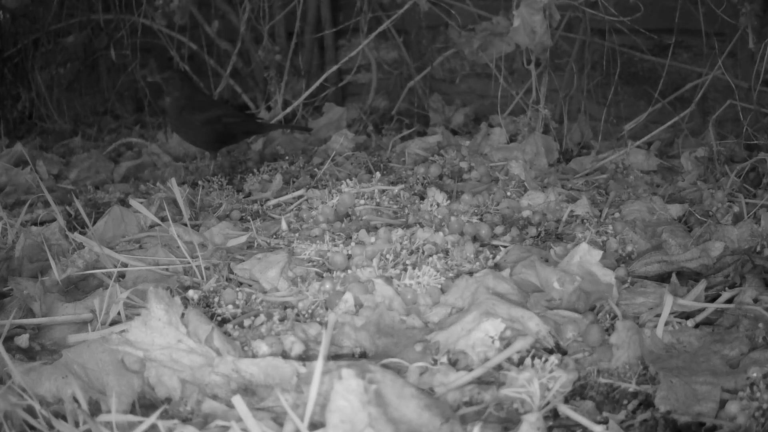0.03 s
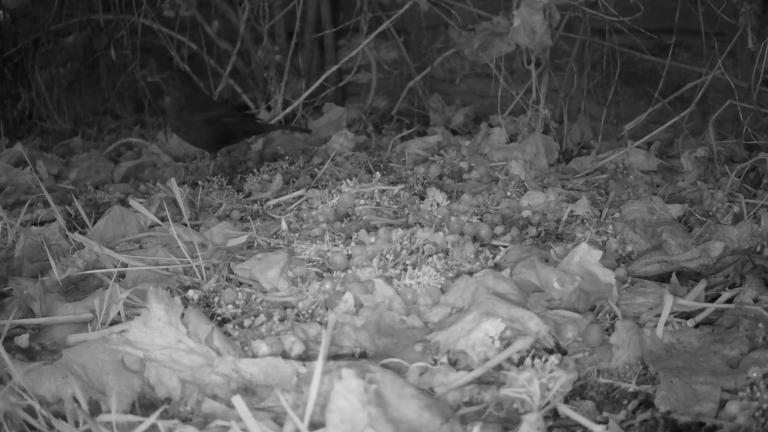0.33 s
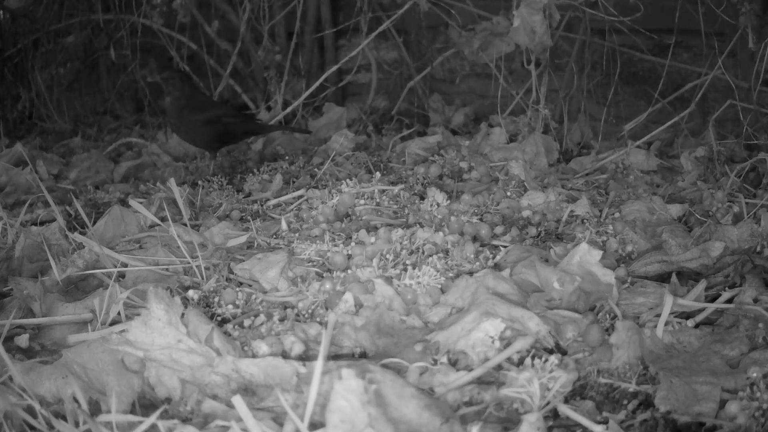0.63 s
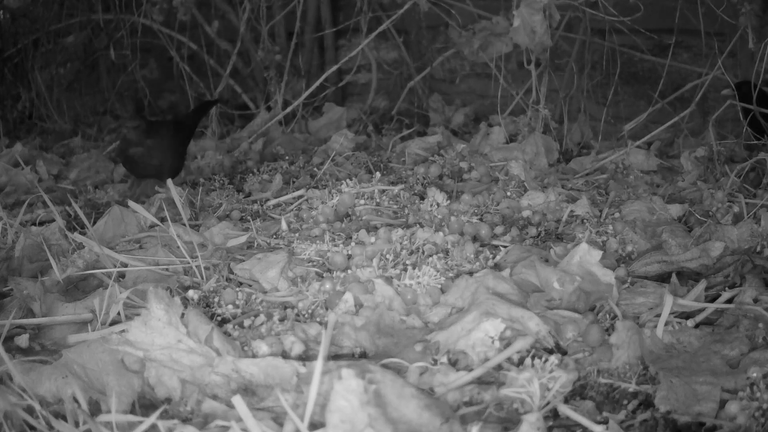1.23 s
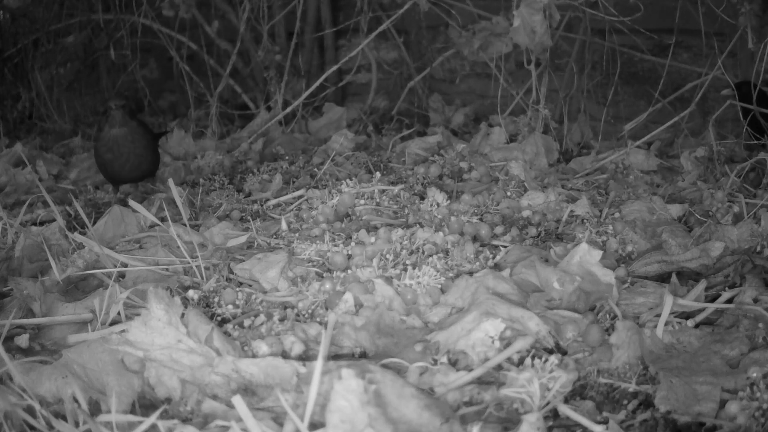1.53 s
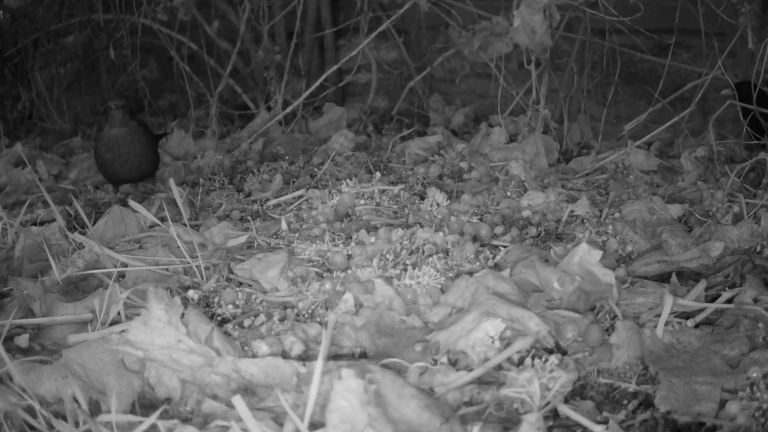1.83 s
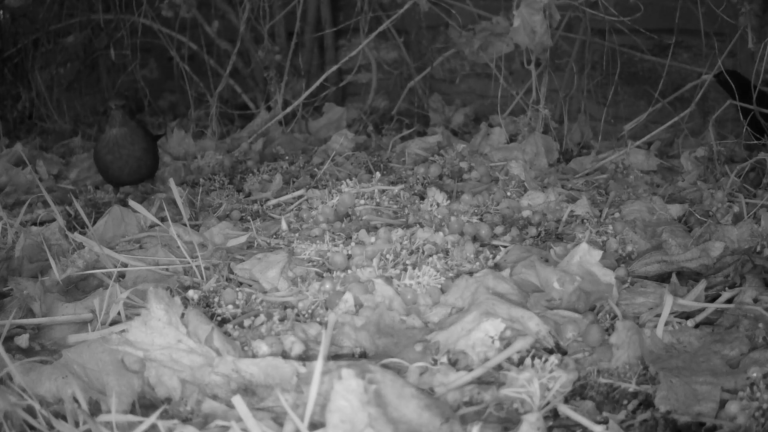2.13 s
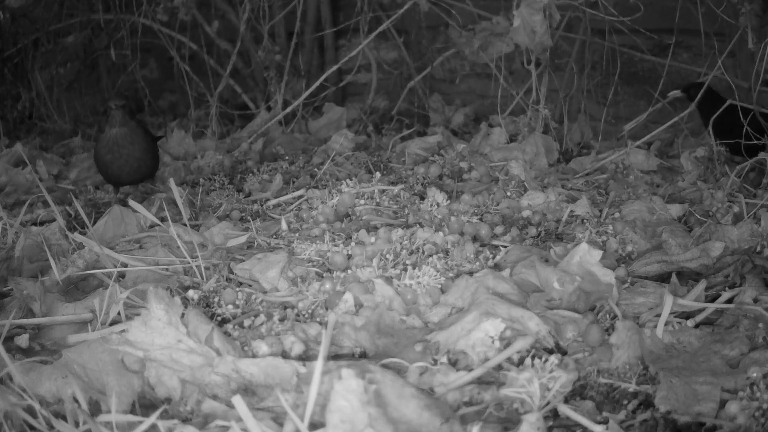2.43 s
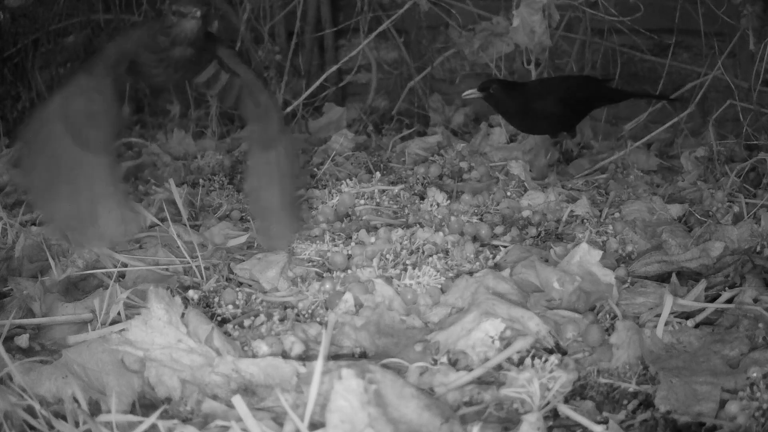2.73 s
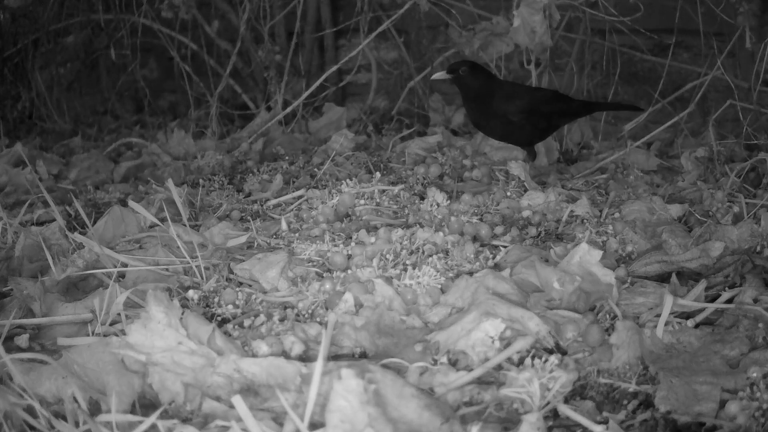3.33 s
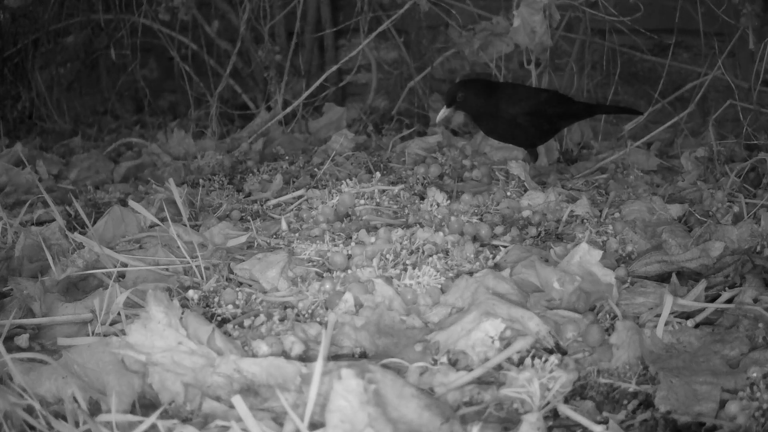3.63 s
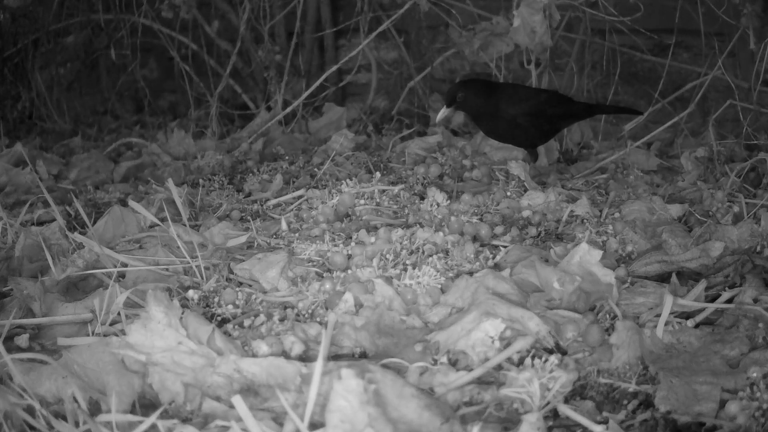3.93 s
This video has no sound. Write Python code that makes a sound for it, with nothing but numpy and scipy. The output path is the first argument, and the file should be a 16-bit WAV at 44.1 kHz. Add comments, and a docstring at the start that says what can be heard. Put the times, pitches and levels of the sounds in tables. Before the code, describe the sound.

Dry leaf litter crackles lightly as birds hop and flick their wings in quiet undergrowth. After a brief, faint chirp, one takes off with snapping stalks and passes so close that a loud gust hits the microphone.

```python
"""Blackbirds in dry leaves

Blackbirds look for food over a low outdoor hiss: leaves crackle, wings thump softly and stalks snap.
One bird gives a short chirp that ends in a trill, and a faint, whistle-like tone falls after it.
Then a bird takes off and flies so close that the air it stirs buffets the microphone."""
import sys
import numpy as np
from scipy import signal
from scipy.fft import rfft, irfft, next_fast_len
from scipy.io import wavfile
from scipy.ndimage import map_coordinates

SR = 44100
rng = np.random.default_rng(int(sys.argv[2]) if len(sys.argv) > 2 else 0)


def wav_record(signal):
    """Record a signal, one row per channel, as 16-bit PCM in the file named by sys.argv[1]."""
    frames = np.transpose(np.atleast_2d(signal))
    bounded = np.clip(frames, -1, 1)
    # unit amplitude maps onto the largest positive 16-bit level
    quanta = np.round(bounded * 32767).astype(np.int16)
    wavfile.write(sys.argv[1], SR, quanta)


N = 176400

# How loud the outdoor hiss is: time_s, level_db
HISS_LEVELS = [(0, -62.5), (1.2, -62.5), (1.8, -63), (3.3, -61.5), (4, -63)]
# Leaves stirred by feet and wings. Rise and fall each span 20 dB; "crisp" is the treble.
# peak_s, rise_s, fall_s, body_db, crisp_db
LEAF_STIRS = [(.035, 0.17, 0.13, -61.5, -75.5), (0.106, 0.07, 0.022, -58.5, -75),
              (.441, 0.014, 0.023, -57, -71), (0.476, 0.037, .025, -59.5, -77),
              (0.551, 0.033, 0.07, -58.5, -74), (0.654, 0.014, 0.012, -60, -72.5),
              (.92, 0.022, 0.061, -60, -83), (.977, .008, 0.016, -61.5, -78),
              (1.035, 0.037, 0.11, -61, -81.5), (1.146, 0.0072, 0.021, -50.5, -66),
              (1.164, .008, 0.07, -58, -76), (1.268, 0.012, .02, -65, -76), (2.56, 0.067, 0.056, -62, -81),
              (2.608, 0.0089, 0.025, -53.5, -75), (2.694, 0.045, 0.044, -51.5, -70),
              (2.75, 0.013, 0.1, -51.5, -74), (2.794, .005, 0.027, -51, -76),
              (2.826, 0.017, 0.055, -50, -72.5), (2.869, 0.024, 0.059, -47, -71.5),
              (2.938, 0.052, 0.069, -46.5, -68), (2.969, 0.014, 0.067, -51, -75.5),
              (2.997, 0.036, 0.12, -51, -73.5), (3.09, .06, 0.27, -56, -79), (3.255, .035, 0.12, -65, -80)]
# Soft knocks of hops and wing flicks: time_s, level_db, pitch_hz
KNOCKS = [(0.568, -65, 79), (0.977, -55, 118), (1.088, -53, 129), (1.107, -52, 125), (1.173, -58, 100),
          (1.22, -51, 85.5), (1.6, -57, 100), (1.607, -54.5, 125), (1.657, -54.5, 120), (1.87, -52.5, 160),
          (2.265, -54, 129), (2.604, -61, 70), (2.798, -55, 91), (2.869, -50.5, 92), (2.902, -53, 60),
          (2.926, -38, 70), (2.945, -47, 95), (2.986, -46.5, 40), (3.336, -48.5, 150), (3.972, -49, 150)]
# Stalks and stiff leaves breaking: start_s, body_db, crisp_db, fade_s (to fall 60 dB), ring_hz, ring_db
STALK_SNAPS = [(0.7187, -55.5, -77, 0.022, 2200, -51), (0.9021, -44, -76, 0.028, 2300, -41),
               (1.0275, -55, -80, .025, 2480, -44), (1.1205, -53.5, -73, 0.045, 1090, -54),
               (1.161, -60, -72, 0.014, 2770, -50), (1.1873, -53.5, -85, 0.022, 1150, -39),
               (1.1936, -45, -71, 0.018, 2240, -38.5), (2.448, -55, -77, 0.023, 2820, -53),
               (2.6075, -52.5, -75, 0.04, 960, -42), (2.7145, -58, -80, .03, 904, -55),
               (2.789, -48, -66.5, 0.06, 1260, -43), (2.8, -44, -77, 0.028, 2060, -41),
               (2.863, -44.5, -70.5, .025, 1410, -45), (2.8719, -36, -58, .016, 1770, -28.5),
               (2.889, -51.5, -89, 0.06, 1520, -29.5), (2.9442, -29.5, -53.5, 0.016, 1376, -25),
               (2.968, -51.5, -76, .025, 1106, -38), (3.0105, -36, -58, 0.013, 1200, -27.5),
               (3.02, -43.5, -71, .012, 1400, -43.5), (3.312, -62, -80, .015, 3000, -62)]
# The chirp's note and the overtone an octave above it: time_s, pitch_hz, level_db, octave_db
CHIRP_NOTE = [(2.228, 1950, -82, -75), (2.258, 2170, -65, -85), (2.269, 2540, -53, -70),
              (2.282, 2676, -60.5, -72), (2.291, 3020, -55, -63.5), (2.299, 2830, -66, -66),
              (2.307, 2920, -66, -60.5), (2.311, 2374, -55.5, -78), (2.32, 2400, -55, -76),
              (2.368, 2390, -63, -82)]
# The quick pips that end the chirp: time_s, level_db
TRILL_PIPS = [(2.3205, -63), (2.3325, -59), (2.3465, -59), (2.36, -62)]
# The falling, whistle-like tone: time_s, pitch_hz, level_db
FALLING_NOTE = [(2.48, 4920, -90), (2.505, 4650, -82.5), (2.545, 3530, -84), (2.558, 2730, -76),
                (2.569, 2250, -62), (2.592, 1900, -69), (2.632, 1640, -63.5), (2.66, 1830, -72),
                (2.69, 1770, -68)]
# The rush of air from the passing bird: time_s, strength_db
DRAUGHT_SWELL = [(2.95, -77), (2.995, -65), (3.023, -39.5), (3.038, -46), (3.052, -30.5), (3.09, -29.5),
                 (3.12, -24), (3.143, -20.5), (3.158, -29), (3.178, -37.5), (3.205, -50.5), (3.25, -61.5),
                 (3.32, -85.5)]
# Small whirls of air that hit the microphone: time_s, peak_db, width_s
AIR_WHIRLS = [(3.0693, -22.5, 0.00041), (3.1005, -15.5, 0.00024), (3.1109, -19.5, 0.00034),
              (3.1272, -4.5, 0.00028), (3.133, -19, 0.00022), (3.139, -3, .00035), (3.142, -11, 0.00019),
              (3.1465, -17.5, 0.00045), (3.1497, -14.5, 0.00025), (3.1534, -12, 0.00026),
              (3.174, -28, 0.00033)]

# Tone curves say how strong a sound is from low to high. All have: frequency_hz, relative_db
HISS_TONE = [(20, -6), (50, -4.5), (100, -8.5), (170, -6), (260, -4.5), (400, -1.5), (780, 0.5), (1050, -3),
             (1600, -6.5), (2500, -13), (3300, -19.5), (4000, -23), (5000, -30.5), (6300, -36.5),
             (8000, -39), (10000, -44.5), (15500, -43.5)]  # outdoor air
TOP_LEAF_TONE = [(100, -20), (500, -1), (1000, 0), (1650, -1.5), (2700, -4.5), (4000, -14.5), (5200, -30.5),
                 (9000, -55.5)]  # body of the top leaves
DEEP_LEAF_TONE = [(100, -17.5), (500, -3.5), (1000, 1.5), (1650, 1), (2300, -3), (4000, -14.5), (5200, -30),
                  (9000, -52.5)]  # body of the deep leaves the bird pushes off from
CRISP_TONE = [(2000, -22.5), (4500, 2), (6500, 0.5), (9000, -5), (11500, -13.5), (15500, -19)]  # treble of dry leaves cracking
SCUFF_TONE = [(30, -2), (80, 4), (200, -5), (450, -24), (1500, -71)]  # leaves shifting under a knock
BEAK_TONE = [(6600, -13), (8000, -26), (9000, -21), (9800, -27), (11400, -27), (12500, -33)]  # high overtones let through by throat and beak, compared with the octave
BREATH_TONE = [(1500, -14), (4000, 5), (5200, 6), (7500, -13), (11000, -8), (13000, -34)]  # airy part of the chirp
DRAUGHT_LOW_TONE = [(20, -27.5), (60, -11), (108, -1.5), (165, -14), (275, 3.5), (500, -5.5), (800, -15),
                    (1300, -34.5), (2500, -47.5), (5000, -83.5)]  # rumble of the rushing air
DRAUGHT_HIGH_TONE = [(100, -22), (350, -3), (700, -4), (1150, 3), (1500, -24.5), (2200, -29.5), (3200, -47),
                     (6000, -87.5)]  # its brighter part


def amp(db):
    """Turn decibels into a number to multiply a sound by."""
    return 10 ** (np.asarray(db) / 20)


def unit(x):
    """Scale a sound so that its average power is 1."""
    return x / np.sqrt(np.mean(x ** 2) + 1e-20)


def clock():
    """The time of each sample, in seconds."""
    return np.arange(N) / SR


def wobble(per_s):
    """A smooth curve through per_s random values each second."""
    return map_coordinates(rng.standard_normal(int(N * per_s / SR) + 4), [clock() * per_s])


def colour(x, tone):
    """Filter a sound so that it follows a tone curve."""
    size = 2 * next_fast_len(N // 2 + 8192)
    hz, db = np.transpose(tone)
    log_hz = np.log(np.fft.rfftfreq(size, 1 / SR) + 1)
    gain = unit(amp(np.interp(log_hz, np.log(hz), db)))
    # These steps make the filter ring only after a click, never before it.
    log_response = irfft(np.log(gain + 1e-9))
    log_response[1:size // 2] *= 2
    log_response[size // 2 + 1:] = 0
    return irfft(rfft(x, size) * np.exp(rfft(log_response)))[:N]


def noise(tone):
    """Noise shaped by a tone curve, with an average power of 1."""
    return unit(colour(rng.standard_normal(N), tone))


def outdoor_hiss(waver_db=0.67):
    """The open air hisses quietly, and its level wavers a little."""
    level_db = np.interp(clock(), *np.transpose(HISS_LEVELS)) - waver_db * wobble(5)
    return amp(level_db) * noise(HISS_TONE)


def crackle(cracks_per_s=1900, spread_db=4, rubbing=0.28):
    """Tiny cracks of uneven size, over the smooth rubbing of leaf on leaf."""
    cracks = (rng.random(N) < cracks_per_s / SR) * rng.choice([-1, 1], N)
    sizes = amp(spread_db * np.clip(rng.standard_normal(N), -2, 2))
    return unit(unit(cracks * sizes) + rubbing * rng.standard_normal(N))


def leaf_tone(body, crisp, push_off_s=(2.5, 2.8)):
    """Give a sound the tone of leaves, which shifts as the feet sink from the top layer to the deep one."""
    depth = np.interp(clock(), push_off_s, [0, 1])
    top = colour((1 - depth) * body, TOP_LEAF_TONE)
    return top + colour(depth * body, DEEP_LEAF_TONE) + colour(crisp, CRISP_TONE)


def rustles():
    """Each stir of the leaves makes a crackle that swells and fades."""
    t, body_power, crisp_power = clock(), np.zeros(N), np.zeros(N)
    for peak_s, rise_s, fall_s, body_db, crisp_db in LEAF_STIRS:
        from_peak = np.maximum((peak_s - t) / rise_s, (t - peak_s) / fall_s)
        swell_db = -20 * np.minimum(from_peak, 10)
        body_power += amp(body_db + swell_db) ** 2
        crisp_power += amp(crisp_db + swell_db) ** 2
    return leaf_tone(np.sqrt(body_power) * crackle(), np.sqrt(crisp_power) * crackle())


def undergrowth_echo(x, level_db=-21, fade_s=0.35):
    """Stems and ground scatter the sound into a short, soft echo."""
    t = np.arange(SR // 3) / SR
    tail = rng.standard_normal(len(t)) * amp(-60 * t / fade_s)
    return amp(level_db) * signal.fftconvolve(x, tail / np.linalg.norm(tail))[:N]


def thumps(width_cycles=0.31, roughness=0.31, scuff_db=-14, scuff_fade_s=0.11):
    """A hop or wing flick makes one low, uneven swing of air pressure, and the leaves shift under it."""
    t, knocks, scuff = clock(), np.zeros(N), np.zeros(N)
    swirl = roughness * wobble(350)
    for time_s, level_db, pitch_hz in KNOCKS:
        cycles = (t - time_s) * pitch_hz
        near = np.abs(cycles) < 2
        swell = np.exp(-(cycles[near] / width_cycles) ** 2)
        knocks[near] += amp(level_db) * swell * (np.sin(2 * np.pi * cycles[near]) + swirl[near])
        fade_db = -60 * np.abs(t - time_s) / scuff_fade_s
        scuff += amp(level_db + scuff_db + fade_db) * np.clip(cycles + 1, 0, 1)
    return knocks + scuff * noise(SCUFF_TONE)


def snaps(first_crack=4.5, ring_rise_s=0.0008, ring_fade_s=0.012, upper_ratio=1.7, upper_db=-13):
    """A stalk breaks with a sharp crack, splinters and rings briefly at two pitches."""
    body, crisp, rings = np.zeros((3, N))
    t = np.arange(SR // 10) / SR
    ring_shape = amp(-60 * t / ring_fade_s) * (1 - np.exp(-t / ring_rise_s))
    for start_s, body_db, crisp_db, fade_s, ring_hz, ring_db in STALK_SNAPS:
        start = round(start_s * SR)
        span = slice(start, start + len(t))
        phase = 2 * np.pi * ring_hz * t
        ring = np.sin(phase) + amp(upper_db) * np.sin(upper_ratio * phase)
        rings[span] += amp(ring_db) * ring_shape * ring
        splinters = rng.standard_normal(len(t)) * amp(-60 * t / fade_s)
        splinters[0] = first_crack
        body[span] += amp(body_db) * splinters
        crisp[span] += amp(crisp_db) * splinters
    return leaf_tone(body, crisp) + rings


def note_curves(rows, jitter, edge_s=0.007):
    """A note's slightly unsteady pitch, and a loudness curve for each level column."""
    times_s, pitches_hz, *levels_db = np.transpose(rows)
    t = clock()
    pitch_hz = np.interp(t, times_s, pitches_hz) * (1 + jitter * wobble(370))
    fade = np.clip(np.minimum(t - times_s[0], times_s[-1] - t) / edge_s, 0, 1)
    return pitch_hz, *(np.sqrt(2) * fade * amp(np.interp(t, times_s, db)) for db in levels_db)


def rough_tone(phase, roughness, per_s):
    """A pure tone made rough by quick random flutter."""
    flutter = wobble(per_s) * np.sin(phase) + wobble(per_s) * np.cos(phase)
    return np.sin(phase) + roughness * flutter


def chirp(rasp=0.22, trill_level_dip=0.55, trill_pitch_dip=0.092, breath_db=-75, puff_db=-70):
    """A bird's raspy note opens with a puff of breath, rises, falls and breaks into a trill."""
    t = clock()
    pitch_hz, gain, octave_gain = note_curves(CHIRP_NOTE, jitter=0.021)
    pip_count = np.interp(t, [time_s for time_s, _ in TRILL_PIPS], np.arange(len(TRILL_PIPS)))
    between_pips = np.sin(np.pi * pip_count) ** 2
    pitch_hz *= 1 - trill_pitch_dip * between_pips
    gain *= 1 - trill_level_dip * between_pips
    phase = 2 * np.pi * np.cumsum(pitch_hz) / SR

    def harmonic(k):
        """The tone at k times the pitch; higher ones are raspier."""
        return rough_tone(k * phase, k * rasp, per_s=1100)

    note = gain * harmonic(0.99)
    overtones = harmonic(2.01)
    for k in (3, 4):
        overtones += amp(np.interp(k * pitch_hz, *np.transpose(BEAK_TONE))) * harmonic(k)
    breath = amp(breath_db) * (gain / gain.max()) ** 0.2  # loosely follows the note
    puff = amp(puff_db) * np.exp(-((t - 2.246) / 0.004) ** 2)  # a few milliseconds around 2.246 s
    return note + octave_gain * overtones + (breath + puff) * noise(BREATH_TONE)


def pips(top_hz=5660, width_s=0.0014, droop_hz=149):
    """The bird's trill has tiny high pips, each drooping in pitch at both ends."""
    t, out = clock(), np.zeros(N)
    for time_s, level_db in TRILL_PIPS:
        offset = (t - time_s) / width_s
        near = np.abs(offset) < np.pi
        phase = 2 * np.pi * np.cumsum(top_hz - droop_hz * offset[near] ** 2) / SR
        out[near] += amp(level_db) * np.exp(-offset[near] ** 2 / 2) * np.sin(phase)
    return out


def falling_tone(roughness=0.62):
    """A distant bird's faint, rough, whistle-like note that falls in pitch, blurred through stems."""
    pitch_hz, gain = note_curves(FALLING_NOTE, jitter=0.0166)
    phase = 2 * np.pi * np.cumsum(pitch_hz) / SR
    return gain * unit(rough_tone(phase, roughness, per_s=280))


def settling_leaves(start_s=2.8, level_db=-80, fade_db_per_s=30, ticks_per_s=60, tick_fade_s=0.008):
    """Stirred leaves fall back with scattered dry ticks that die away."""
    t = clock()
    landings = (rng.random(N) < ticks_per_s / SR) * rng.random(N) ** 2
    tick_shape = amp(-60 * t[:SR // 20] / tick_fade_s)
    ticks = signal.fftconvolve(landings, tick_shape)[:N] * noise(CRISP_TONE)
    return unit(ticks) * (t > start_s) * amp(level_db - fade_db_per_s * np.abs(t - start_s))


def draught(low_db=-2, high_db=-4, brightening=2.6):
    """The passing bird churns the air, which sounds brighter as the rush grows stronger."""
    strength_db = np.interp(clock(), *np.transpose(DRAUGHT_SWELL), left=-150, right=-150)
    peak_db = strength_db.max()
    rumble = amp(strength_db + low_db) * noise(DRAUGHT_LOW_TONE)
    bright_db = peak_db + high_db + brightening * (strength_db - peak_db)
    return rumble + amp(bright_db) * noise(DRAUGHT_HIGH_TONE)


def bump(time_s, width_s):
    """One smooth, bell-shaped pulse."""
    return np.exp(-np.minimum(((clock() - time_s) / width_s) ** 2 / 2, 100))


def whirls(wake_ratio=2.03, crack_db=-11.5, crack_s=0.0001):
    """Each whirl of air hits the microphone: a push with a wider suck around it and a thin crack inside."""
    out = np.zeros(N)
    for time_s, peak_db, width_s in AIR_WHIRLS:
        suction = bump(time_s, width_s * wake_ratio) / wake_ratio
        push = (bump(time_s, width_s) - suction) / (1 - 1 / wake_ratio)
        crack = amp(2 * peak_db + crack_db) * bump(time_s, crack_s)  # strong whirls crack far more
        out += amp(peak_db) * push + crack
    return out


def scene():
    """Mix everything into one channel; the thumps and the sounds of the air get no echo."""
    in_undergrowth = rustles() + snaps() + settling_leaves() + chirp() + pips() + falling_tone()
    echo = undergrowth_echo(in_undergrowth)
    return (in_undergrowth + echo + thumps() + draught() + whirls() + outdoor_hiss())[None]


def record(dry, top_hz=15750):
    """Cut away the very highest treble, above top_hz."""
    size = next_fast_len(N + SR // 2)
    kept = np.fft.rfftfreq(size, 1 / SR) < top_hz
    return irfft(rfft(dry, size) * kept, size)[:, :N]


dry = scene()
out = record(dry)
wav_record(out)
```